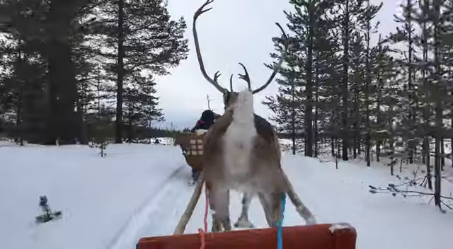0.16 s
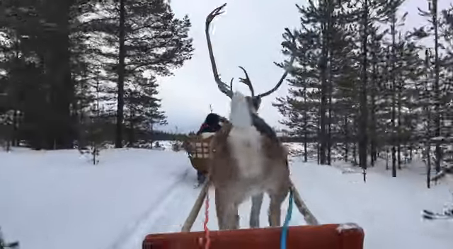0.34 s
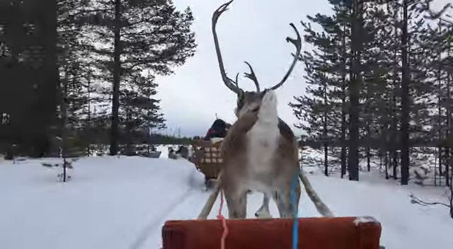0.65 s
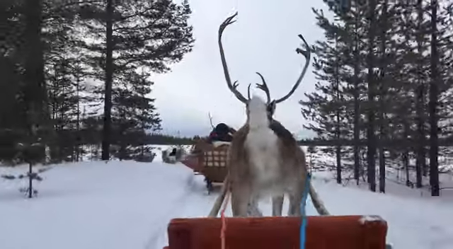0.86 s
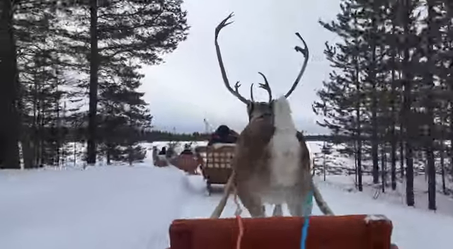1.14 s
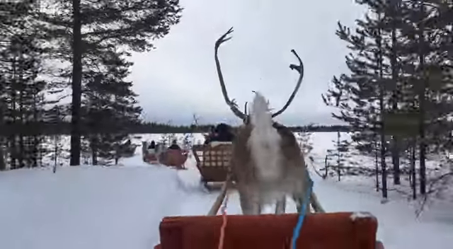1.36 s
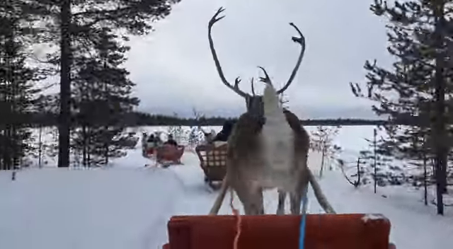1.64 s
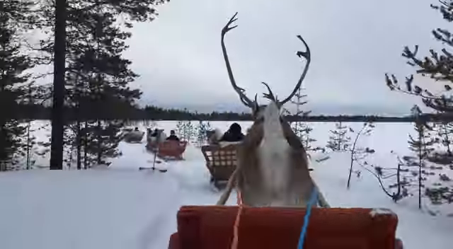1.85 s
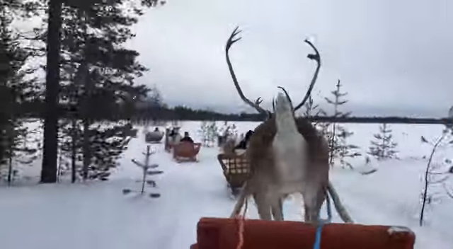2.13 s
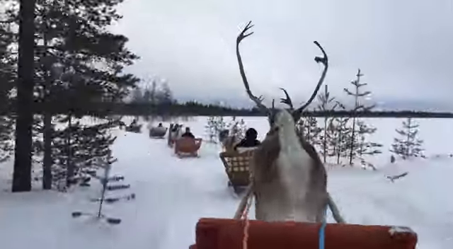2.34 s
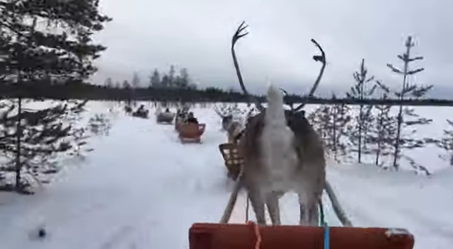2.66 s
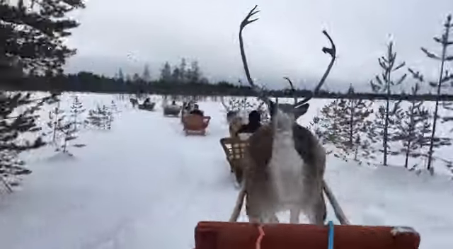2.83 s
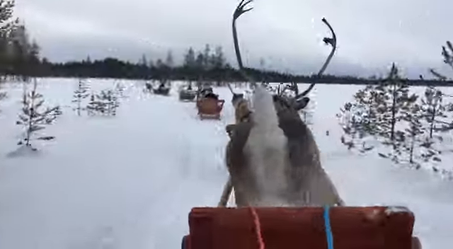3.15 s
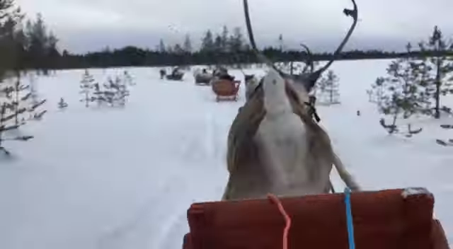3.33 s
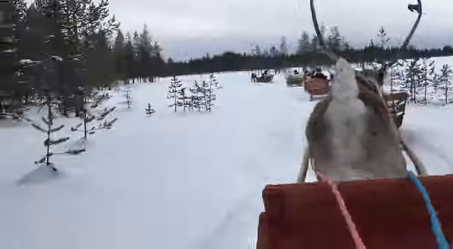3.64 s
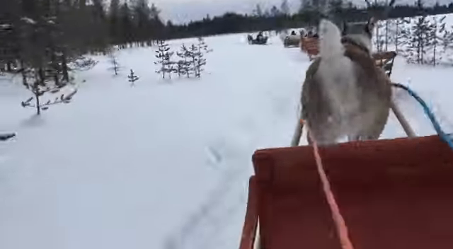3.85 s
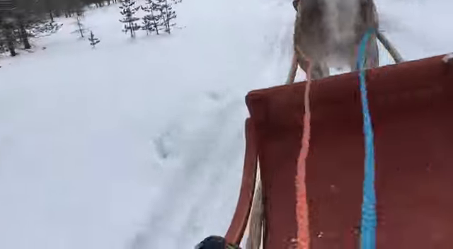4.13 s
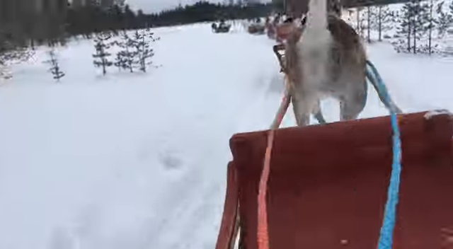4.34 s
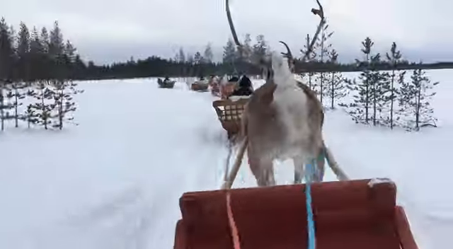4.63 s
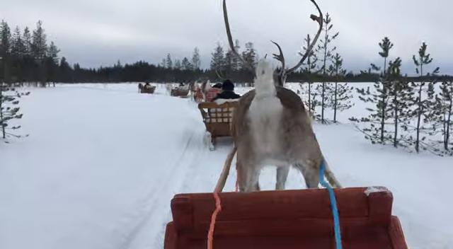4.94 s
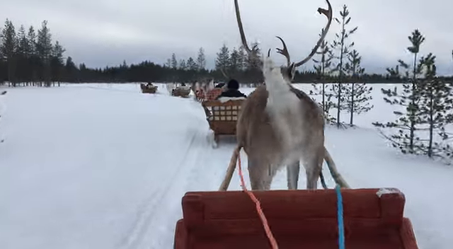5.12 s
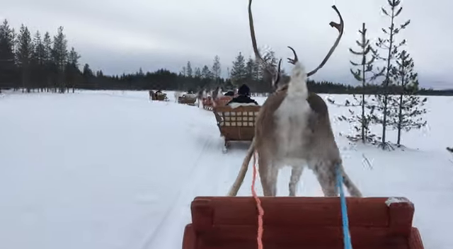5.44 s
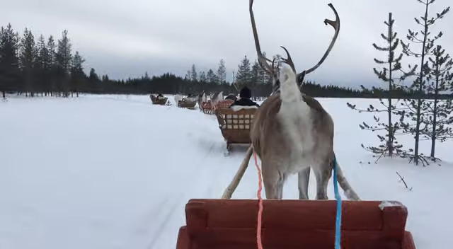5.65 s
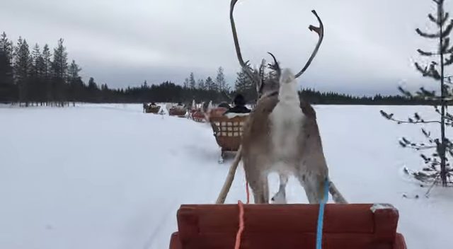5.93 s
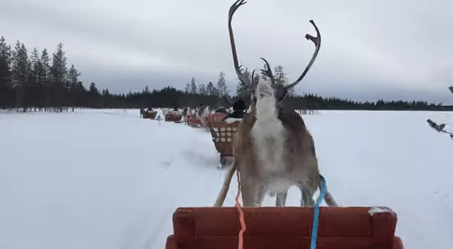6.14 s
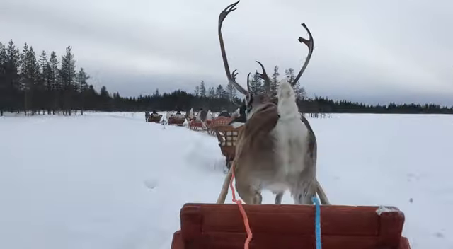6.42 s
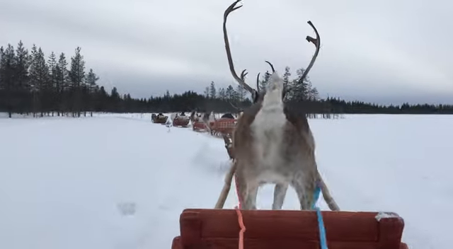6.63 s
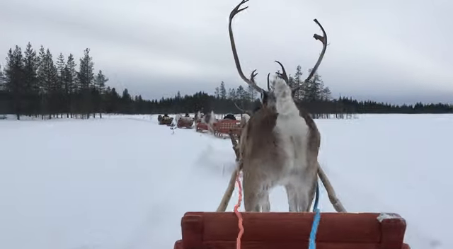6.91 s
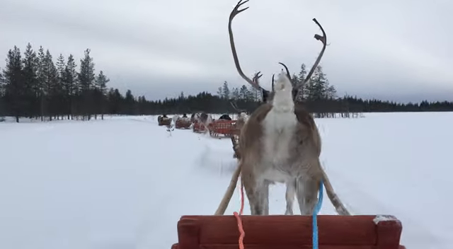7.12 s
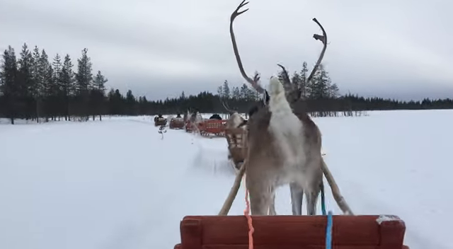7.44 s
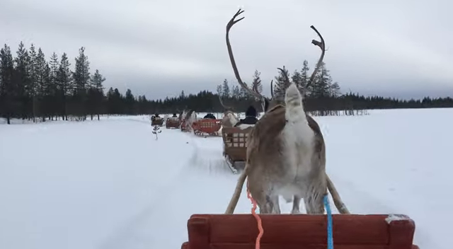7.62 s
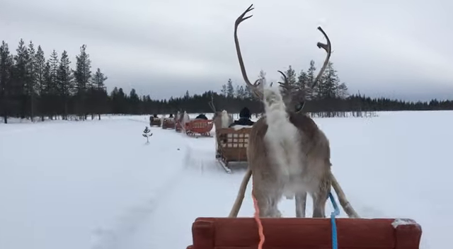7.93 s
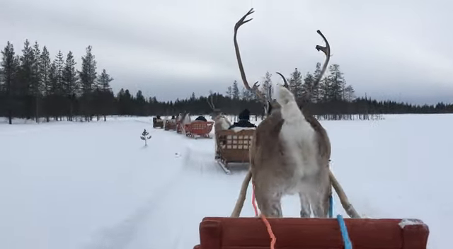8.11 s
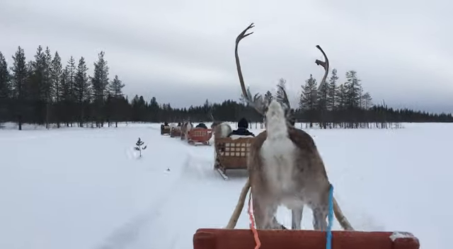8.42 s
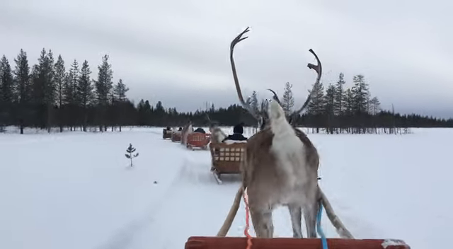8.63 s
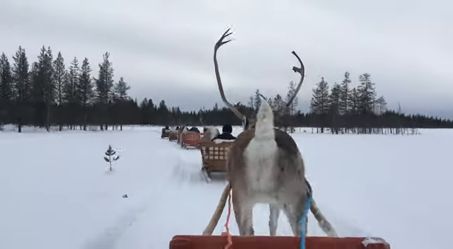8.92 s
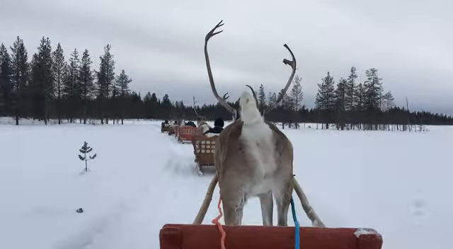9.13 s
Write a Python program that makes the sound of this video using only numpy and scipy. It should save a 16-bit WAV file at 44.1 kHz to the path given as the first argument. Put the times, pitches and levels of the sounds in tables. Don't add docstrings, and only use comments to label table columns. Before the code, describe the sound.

A microphone aboard a hollow wooden sleigh, close and dry in open air, as a reindeer pulls it over packed snow. A low uneven rumble and soft, grainy runner scrape continue throughout, with a thin hiss above. From 0 to 1.5 seconds, heavy dull thumps come quickly, strongest near 0.4 and 0.8, with board slaps, a short low groan and icy ticks. After a calmer gap, a hard wooden knock at 1.95 leads into bright crunches and a tiny squeak at 2.0. Another thump lands at 2.6. Around 3.1 to 3.3 a rough cluster booms, snaps and scrapes; lesser bumps follow at 3.7. Rapid thuds and knocks return from 4.35 to 4.65. A solid woody thump hits at 5.8, then lighter bumps, small rattles and muffled scraping continue to about 9.3, with very faint distant bell tinkles near 2.5, 7.5 and 8.3.

```python
import sys
import numpy as np
from scipy import signal
from scipy.fft import rfft, irfft, next_fast_len
from scipy.io import wavfile
from scipy.ndimage import uniform_filter1d, map_coordinates

SR = 44100
rng = np.random.default_rng(int(sys.argv[2]) if len(sys.argv) > 2 else 0)


def natural_amplitude(level_db):
    exponent = np.asarray(level_db, float) / 20
    return 10 ** exponent


def put_to_file(sound):
    columns = np.atleast_2d(sound).T
    safe = np.clip(columns, -1, 1)
    whole_steps = np.round(safe * 32767)
    wavfile.write(sys.argv[1], SR, whole_steps.astype(np.int16))


N = 408807

# mode_hz, width_hz, level_db
HULL = [
    (129.1, 48.5, -4),
    (173.4, 45, -.5),
    (232.5, 73, -8.5),
]
# mode_hz, width_hz, level_db
BOARDS = [
    (269, 65, -11),
    (366.5, 46, -8),
]
# mode_hz, width_hz, level_db
PLANK = [(384, 85, 1), (586, 70, 1.5), (662, 31, -4.5), (890, 57, -5), (1000, 89, -4.5), (1400, 200, -8.5),
         (1510, 120, -13), (1810, 400, -19.5)]
THUMP_RISE_S, THUMP_FALL_S = 0.013, 0.038


def unit(x):
    return x / np.sqrt(np.mean(x ** 2) + 1e-20)


def peaked(x):
    return x / np.abs(x).max()


def curves(rows):
    s, *cols = np.transpose(rows)
    return [np.interp(np.arange(N) / SR, s, c) for c in cols]


def wobble(rate):
    knots = rng.standard_normal(int(N * rate / SR) + 4)
    return map_coordinates(knots, [np.arange(N) * rate / SR])


def filtered(x, response):
    m = next_fast_len(len(x) + 2048)
    return irfft(rfft(x, m) * response(np.fft.rfftfreq(m, 1 / SR)), m)[:len(x)]


def coloured(x, spectrum):
    f, db = np.transpose(spectrum)
    return unit(filtered(x, lambda hz: natural_amplitude(np.interp(np.log(hz + 1), np.log(f), db, -120, -120))))


def resonances(modes):
    def response(f):
        total = 0
        for k, (c, w, db) in enumerate(modes):
            total = total + (-1) ** k * natural_amplitude(db) * 1j * f * w / (c * c - f * f + 1j * f * w)
        return total
    return response


def gritty(per_s, spread_db, share, patchy_db):
    z = signal.stft(rng.standard_normal(N), nperseg=512)[2]
    field = uniform_filter1d(rng.standard_normal(z.shape), size=6, axis=0)
    field = uniform_filter1d(field, size=6, axis=1)
    noise = signal.istft(z * natural_amplitude(patchy_db * unit(field)), nperseg=512)[1][:N]
    force = rng.standard_normal(N) * natural_amplitude(spread_db * rng.exponential(size=N))
    breaks = (rng.random(N) < per_s / SR) * force
    share = np.clip(share, 0, 1)
    return np.sqrt(1 - share) * unit(noise) + np.sqrt(share) * unit(breaks)


def add(track, s, sound):
    at = track[round(s * SR):][:len(sound)]
    at += sound[:len(at)]


def ring(hz, t60, attack):
    t = np.arange(SR // 8) / SR
    return np.sin(2 * np.pi * hz * t) * natural_amplitude(-60 * t / max(t60, .002)) * (1 - np.exp(-t / attack))


def burst(t60, attack):
    t = np.arange(SR // 8) / SR
    return rng.standard_normal(len(t)) * natural_amplitude(-60 * t / max(t60, .004)) * (1 - np.exp(-t / attack))


def swells(events, rise_s, fall_s):
    t, power = np.arange(N) / SR, np.zeros(N)
    for s, db in events:
        near = slice(max(round((s - .25) * SR), 0), round((s + .35) * SR))
        lag = t[near] - s
        power[near] += natural_amplitude(2 * db) * np.exp(-(lag / np.where(lag < 0, rise_s, fall_s)) ** 2)
    return power


def thumps():
    # start_s, peak_db, mode_hz, boards_db
    deep = [(.072, -9, 89, -13.5), (.38, -1, 141.6, -24), (.583, -11, 129, -9.5), (.807, -4.5, 150, -9),
            (.88, -6, 148, -18), (.958, -12, 100, -34), (1.269, -12.5, 227, -5), (1.957, -5, 134, -5),
            (2.573, -3.5, 143.4, -8), (2.746, -10, 141, -13), (2.944, -8.5, 163.5, -34),
            (3.109, -7.5, 183, -9), (3.228, 0.5, 156, -29), (3.672, -5, 136, -18), (3.726, -5.5, 161, -23),
            (4.35, -7.5, 144, -20), (4.413, -4, 131.6, -6), (4.474, -0.5, 143.4, -13),
            (4.528, -5, 134, -6.5), (4.638, -8.5, 134, -17), (5.136, -13.5, 182, -32),
            (5.796, -3, 127, -3.5), (6.02, -9, 139, -8), (6.584, -11.5, 150, -25), (7.437, -12, 144, -6.5),
            (8.011, -11.5, 164, -20), (8.278, -13, 140, -15), (8.44, -8, 168, -19),
            (8.583, -10.5, 167, -11), (8.923, -10, 149, -6.5)]
    # start_s, peak_db, mode_hz
    prints = [(0.017, -17, 171), (.35, -10, 166), (6.2, -22, 175), (6.235, -19.5, 175), (6.318, -13.5, 167),
              (6.47, -17.5, 170), (3.127, -10, 169), (.62, -11, 85), (.915, -10, 170), (1.308, -12, 90),
              (2.6, -9, 159), (2.955, -11, 150), (1.462, -19, 150), (1.586, -17.5, 123), (2.146, -16, 171),
              (2.496, -15.5, 128), (2.9, -14, 167), (3.247, -4, 161), (3.271, -2, 138), (4.44, -7.5, 141),
              (3.449, -14, 170), (8.672, -12.5, 193), (3.596, -9, 188), (3.836, -12.5, 155),
              (4.815, -15.5, 178), (5.305, -18, 155), (5.468, -17, 122), (6.299, -17, 337),
              (6.43, -20.5, 360), (6.679, -19.5, 221), (6.816, -22.5, 172), (6.934, -17.5, 94),
              (6.998, -18.5, 236), (7.307, -16, 169), (7.561, -17.5, 179), (7.68, -21, 157),
              (7.899, -13.5, 180), (8.129, -21, 177), (8.374, -21, 141), (9.083, -14.5, 149),
              (9.221, -12.5, 147)]
    return deep + [(s, db, hz, -16.5) for s, db, hz in prints]


def unevenness_db():
    # centre_s, level_db
    dips_and_swells = [(.53, -4), (1.03, -3), (1.86, -4), (2.35, -3.5), (2.68, -2), (2.99, -5.5), (3.2, -5.5),
                       (3.49, -5), (4.78, -4), (4.96, -4), (5.03, -4), (5.24, -3), (5.77, -3), (5.98, -4),
                       (6.39, -5.5), (6.65, -3), (6.88, -5.5), (8.23, -9), (8.32, -7), (8.52, -3.5), (8.77, -8),
                       (9.0, -2.5), (9.06, -3.5), (.13, 3.5), (.47, 3), (1.45, 2.5), (1.62, 1.5), (2.03, 5),
                       (2.8, 1.5), (3.06, 3.5), (3.71, 3.5), (4.24, 3), (4.32, 3.5), (4.46, 3), (4.52, 5),
                       (5.1, 4.5), (5.43, 4), (5.61, 4.5), (6.15, 3.5), (6.27, 3.5), (6.49, 3.5), (7.07, 3.5),
                       (7.5, 3), (7.61, 5), (7.77, 4.5), (8.05, 4), (8.45, 3), (8.69, 2.5)]
    half_s = 0.028
    out, hump = np.zeros(N + SR), signal.windows.hann(round(4 * half_s * SR))
    for s, db in dips_and_swells:
        add(out, s - 2 * half_s, db * hump)
    return out[:N]


def hull():
    # time_s, level_db
    bumpiness = [(0, -28), (.25, -23), (.5, -22.5), (.77, -22.5), (.95, -34), (1.06, -34), (1.27, -23.5),
                 (1.9, -32), (2.19, -28.5), (2.39, -37), (2.55, -29.5), (3.17, -23.5), (3.54, -33),
                 (4.3, -23), (5.21, -28), (6.3, -27), (7.15, -33), (9.27, -25)]
    # centre_s, level_db
    lurches = [(0.1, -22), (0.4, -22.4), (0.63, -20), (0.89, -17), (1.32, -17), (1.5, -23), (1.77, -22),
               (1.99, -27), (2.17, -28), (2.3, -22.5), (2.53, -22), (2.67, -26.5), (2.77, -23), (3.28, -23),
               (3.36, -25.5), (3.73, -28), (4.07, -30), (4.42, -28), (5.81, -30), (6.63, -24.5),
               (6.8, -22.5), (7.03, -24.5), (7.26, -27.7), (7.45, -32), (7.86, -24.5), (8.17, -31.5),
               (8.29, -30.5), (8.5, -32), (8.94, -32), (9.1, -29)]
    # frequency_hz, density_db (per Hz)
    sway_spectrum = [(22, -30), (32, -9), (45, -2), (65, 0), (90, -1), (120, -14), (160, -60)]
    ride_db, = curves(bumpiness)
    shudder = swells([(s + 0.01, db - 11.5) for s, db, *_ in thumps()], THUMP_RISE_S, THUMP_FALL_S)
    boom_gain = np.sqrt(natural_amplitude(2 * ride_db) + shudder) * natural_amplitude(unevenness_db())
    lurch = swells(np.add(lurches, [0, -2.5]), rise_s=0.044, fall_s=0.052)
    steady_db = -41 + 0.49 * (ride_db - ride_db.mean())
    sway_gain = np.sqrt(natural_amplitude(2 * steady_db) + lurch)

    jolts = natural_amplitude(1.5 * wobble(25) + .6 * wobble(9))
    shake = gritty(per_s=60, spread_db=1.2, share=0.3, patchy_db=0.56) * jolts
    boom = unit(filtered(shake, lambda f: resonances(HULL)(f) / (1 + (f / 300) ** 4)))
    boards = unit(filtered(shake, lambda f: resonances(BOARDS)(f) / (1 + (f / 450) ** 6)))
    slats = unit(filtered(shake, lambda f: resonances(PLANK[1:])(f) / (1 + (f / 1500) ** 4)))
    boards += natural_amplitude(-22.5) * slats
    sway = coloured(rng.standard_normal(N) * natural_amplitude(0.9 * wobble(13)), sway_spectrum)
    boards_gain = natural_amplitude(-14.5 + 3.34 * wobble(4.5))
    return boom_gain * (natural_amplitude(-3.5) * boom + boards_gain * boards) + sway_gain * sway


def runners():
    # time_s, level_db
    hardness = [(0, -46), (.31, -41), (.59, -46.5), (1.0, -48.5), (1.35, -47), (2.27, -47.5), (2.66, -43.5),
                (2.98, -43), (3.1, -33.5), (3.36, -44.5), (3.59, -38), (3.8, -45), (4.65, -47.5),
                (5.52, -45.5), (5.99, -49.5), (6.38, -45), (6.7, -48.5), (9.27, -47.5)]
    hooves = [1.22, 1.84, 2.15, 2.37, 2.45, 3.451, 3.71, 3.94, 4.19, 4.64, 4.95, 5.42, 5.56, 5.65, 5.94,
              6.09, 6.21, 6.98, 7.1, 7.22, 7.42, 7.56, 7.69, 8.25, 8.43, 8.56, 8.86]
    # frequency_hz, density_db (per Hz)
    scrape_spectrum = [(240, -32), (400, -0.5), (507, -10.5), (641, -7), (1200, -16), (1350, -16.5),
                       (1970, -19.5), (2520, -23.5), (4200, -37.5), (5460, -65), (9240, -120)]
    # frequency_hz, density_db (per Hz)
    hiss_spectrum = [(2240, 0.5), (3800, -2.5), (4830, -8), (6190, -3), (7870, -7), (9310, -3), (10500, -7),
                     (12700, 0), (15100, -6.5), (16000, -1)]
    scrape_db, = curves(hardness)
    hiss_db = -54 + (scrape_db - scrape_db.mean())
    spray = swells([(s, -50.5) for s in hooves], rise_s=0.011, fall_s=0.011)
    grind = swells([(s, db - 40) for s, db, *_ in thumps()], THUMP_RISE_S, THUMP_FALL_S)
    rough = .3 * wobble(13) + .8 * wobble(35)
    scrape = coloured(gritty(per_s=700, spread_db=2.5, share=0.24, patchy_db=2.0), scrape_spectrum)
    hiss = coloured(gritty(per_s=2500, spread_db=1.3, share=0.35, patchy_db=2.6), hiss_spectrum)
    scrape_gain = np.sqrt(natural_amplitude(2 * scrape_db) + grind) * natural_amplitude(0.3 + 1.6 * rough + 0.65 * unevenness_db())
    open_air = natural_amplitude(2 * -56)
    hiss_gain = np.sqrt(natural_amplitude(2 * hiss_db + 6 * rough) + spray + open_air)
    return scrape_gain * scrape + hiss_gain * hiss


def ruts():
    out, t60, rows = np.zeros(N), 0.098, thumps()
    chances = rng.standard_normal((len(rows), len(HULL)))
    for (s, db, hz, boards_db), chance in zip(rows, chances):
        main = ring(hz, t60, 0.0067)
        others = sum(natural_amplitude(level + 2 * c) * ring(f, 0.77 * t60, 0.0044) for (f, _, level), c in zip(HULL, chance))
        jar = burst(0.46 * t60, 0.0036)
        boards = peaked(filtered(jar, lambda f: resonances(BOARDS)(f) / (1 + (f / 450) ** 6)))
        add(out, s, natural_amplitude(db) * (natural_amplitude(1.04) * main + natural_amplitude(-10.0) * others + natural_amplitude(boards_db - 1.5) * boards))
    return out


def taps():
    # start_s, peak_db, mode_hz
    slaps = [(0.039, -26, 203), (0.075, -18.5, 218), (0.284, -23, 202), (0.495, -20, 234),
             (0.587, -13, 202), (0.807, -14, 299), (0.911, -12, 269), (1.223, -24, 347), (1.359, -15, 350),
             (1.467, -22, 215), (1.955, -9, 326), (2.155, -20, 261), (2.487, -21, 240), (2.535, -18, 210),
             (2.573, -10, 340), (2.741, -17, 202), (2.871, -26, 234), (2.944, -18, 229), (3.227, -9, 353),
             (3.665, -18, 285), (4.411, -10, 256), (4.475, -10, 231), (4.626, -16, 258), (5.799, -7, 353),
             (6.02, -15, 300), (6.686, -23, 229), (6.784, -19, 337), (6.934, -26, 307), (7.439, -17, 231),
             (7.769, -19, 240), (7.874, -23, 240), (8.279, -22, 229), (8.586, -17, 223), (8.677, -19, 242),
             (8.829, -26, 240), (8.922, -16, 240), (9.142, -24, 202), (9.22, -23, 258)]
    out, t60, rise_s = np.zeros(N), 0.062, 0.0033
    for s, db, hz in slaps:
        upper = ring(1.9 * hz, .5 * t60, rise_s)
        add(out, s - .002, natural_amplitude(db - 3) * (ring(hz, t60, rise_s) + natural_amplitude(-11) * upper))
    return out


def shafts():
    # start_s, peak_db, loudest_mode_hz, snap_db
    knocks = [(.078, -19, 450, -40), (0.176, -28.5, 683, -5.5), (0.337, -24.5, 1130, -3),
              (.371, -21.5, 1250, -25), (.381, -23, 890, -6.5), (0.562, -32, 686, -20),
              (.586, -16.5, 705, -14), (.801, -11.5, 592, -19), (0.876, -21, 437, -20),
              (0.91, -23.5, 600, -15), (1.288, -23, 600, -25), (1.357, -16.5, 714, -31),
              (1.461, -29, 600, -40), (1.952, -7, 560, -14), (2.156, -29.5, 460, -14),
              (2.571, -19.5, 695, -16), (3.124, -22.5, 1130, -13), (3.229, -18.5, 1100, -6),
              (3.237, -17, 1300, 0.5), (3.254, -19, 1200, -4), (3.283, -24, 1000, -11),
              (3.263, -15.5, 510, -21), (3.43, -21.5, 890, -20), (3.597, -21.5, 454, -10),
              (3.663, -27, 945, -5.5), (4.391, -17.5, 664, -37), (4.472, -16.5, 686, -32),
              (4.521, -21.5, 700, -33), (4.81, -32, 550, -9), (4.898, -30, 780, -8.5),
              (5.794, -11.5, 550, -36), (6.016, -17.5, 664, -22), (8.01, -27, 452, -12),
              (8.915, -29.5, 662, -17)]
    # start_s, peak_db
    rattles = [(1.221, -33.5), (1.598, -30), (2.489, -32.5), (2.633, -28), (6.819, -29.5), (7.226, -34),
               (7.341, -35.5), (7.437, -35), (9.14, -37.5)]
    out, t60 = np.zeros(N), 0.09
    for s, db, hz, snap_db in knocks + [(s, db, 600, -8.5) for s, db in rattles]:
        body = filtered(burst(t60, .003), lambda f: 1 / (1 + 1j * f / (1.47 * hz)) ** 2)
        contact = burst(0.054, 0.0011) + natural_amplitude(-1) * body
        contact[30] += 8
        modes = resonances(PLANK + [(hz, 110, 3)])
        wood = filtered(contact, lambda f: modes(f) / (1 + 1j * f / (3.5 * hz)) ** 2)
        snap = filtered(burst(1.12 * t60, 0.00038), lambda f: resonances([(2500, 1500, 0)])(f) ** 2)
        add(out, s - .001, natural_amplitude(db) * (natural_amplitude(1.0) * peaked(wood) + natural_amplitude(snap_db - 3.0) * peaked(snap)))
    return out


def crust():
    # start_s, peak_db, strongest_hz
    ticks = [(.1176, -34, 9220), (.337, -29, 6000), (.381, -34, 4020), (.599, -19.5, 6400),
             (.725, -27, 13500), (0.8007, -24, 8250), (.8719, -33, 6370), (1.108, -28.5, 6300),
             (7.34, -37, 2500), (7.226, -41, 2800), (6.582, -41, 2300), (1.342, -21, 13700),
             (1.9083, -27.5, 12800), (1.956, -21, 12500), (1.982, -14, 8700), (2.006, -14, 13200),
             (2.5915, -25, 5400), (2.603, -25, 8540), (2.86, -25, 7000), (2.919, -21.5, 8050),
             (2.919, -24, 3000), (3.237, -19, 4200), (3.5239, -30, 12500), (3.554, -19.5, 6130),
             (4.038, -30, 11800), (4.389, -29, 5600), (4.441, -33, 4300), (4.482, -30, 11000),
             (4.543, -37, 11000), (5.138, -29.5, 12400), (6.5806, -28.5, 6240), (6.819, -33, 5950),
             (6.976, -35, 6000), (7.948, -26.5, 5970), (8.919, -32.5, 9000), (9.1157, -29, 11800)]
    out = np.zeros(N)
    for s, db, hz in ticks:
        ice = resonances([(hz, 1800, 0), (5000, 5000, -6), (13000, 5000, -6)])
        add(out, s - .001, natural_amplitude(db - 3.0) * peaked(filtered(burst(0.028, 0.00067), ice)))
    return out


def crunches():
    # start_s, length_s, centre_hz, width_hz,
    # level_db
    scuffs = [(1.978, 0.062, 5300, 10000, -30.5), (3.228, 0.048, 1500, 2200, -28),
              (3.7, .045, 7000, 9000, -40), (3.228, 0.051, 5700, 700, -37), (3.233, .015, 2200, 900, -24),
              (3.229, 0.023, 4100, 920, -30), (3.05, .045, 2000, 1200, -42), (4.392, .028, 2000, 1150, -32),
              (4.378, .016, 2700, 400, -41), (4.378, 0.027, 9900, 500, -44), (4.385, .03, 7000, 8000, -43),
              (4.398, .014, 4600, 400, -46), (4.475, 0.057, 1950, 2000, -44),
              (1.952, .016, 1360, 1300, -22), (1.975, 0.049, 1000, 1600, -31.5),
              (2.598, .018, 4500, 9200, -37.5), (2.568, 0.019, 1000, 1000, -31.5),
              (.335, 0.018, 1700, 900, -32), (.376, 0.021, 2400, 1200, -37), (.722, .02, 2400, 1200, -43),
              (.73, .025, 1000, 300, -41), (3.11, 0.047, 2000, 1500, -38), (4.474, .03, 870, 820, -35),
              (4.518, .02, 1000, 810, -35), (.8, .018, 1260, 900, -23.5), (5.797, 0.021, 970, 800, -24.5),
              (1.14, .28, 361, 55, -34), (2.6, .035, 8200, 9000, -47), (3.43, .035, 1230, 1300, -37),
              (4.39, .04, 840, 900, -32), (4.8, 0.11, 840, 900, -43), (4.467, .007, 1240, 610, -26),
              (6.776, .022, 430, 220, -29), (2.743, 0.021, 470, 230, -29), (.335, 0.034, 3200, 400, -39)]
    # start_s, length_s, pitch_hz, level_db
    squeaks = [
        (2.013, .02, 3150, -28),
        (2.006, .026, 12700, -33),
        (2.012, .018, 5500, -31),
        (2.004, .012, 7600, -34),
        (9.11, .02, 11800, -46),
        (.17, .2, 174, -17),
        (5.783, .035, 2850, -41),
    ]
    out = np.zeros(N)
    for s, length, hz, width_hz, db in scuffs:
        n = round(length * SR)
        lumps = natural_amplitude(3.5 * np.repeat(rng.standard_normal(n // 90 + 1), 90)[:n])
        mode = resonances([(hz, 1.3 * width_hz, 0)])
        crush = filtered(lumps * rng.standard_normal(n), lambda f: mode(f) ** 3)
        add(out, s, natural_amplitude(db - 3.5) * signal.windows.tukey(n, .45) * unit(crush))
    for s, length, hz, db in squeaks:
        n = round(length * SR)
        drift = np.cumsum(rng.normal(0, 0.19 * min(hz / 5000, 1), n))
        tone = np.sin(2 * np.pi * hz * np.arange(n) / SR + drift)
        add(out, s, natural_amplitude(db) * signal.windows.tukey(n, .5) * tone)
    return out


def bell():
    # start_s, level_db
    tinkles = [(2.44, -53), (2.475, -55), (2.535, -53), (7.455, -53), (7.66, -57), (7.72, -54), (8.34, -54),
               (8.94, -58)]
    out, modes = np.zeros(N), resonances([(3660, 90, 0), (7400, 150, -8)])
    for s, db in tinkles:
        tinkle = filtered(burst(.18, .006), lambda f: modes(f) ** 2)
        add(out, s, natural_amplitude(db + 4.5) * peaked(tinkle))
    return out


def scene():
    ride = hull() + runners() + ruts() + taps() + shafts()
    return (ride + crust() + crunches() + bell())[None]


def band_limit(x):
    return signal.sosfilt(signal.butter(12, 17000, fs=SR, output="sos"), x)


def record(dry):
    # start_s, length_s
    dropouts = [(.577, .006), (.786, .011), (1.32, .005), (1.331, .006), (1.971, .006), (2.59, .01),
                (2.847, .008), (2.868, .012), (2.885, .011), (2.9, .017), (3.506, .009), (4.467, .007)]
    held = dry[0] / (1 + np.abs(dry[0] / .68) ** 6) ** (1 / 6)
    hole = np.zeros(N)
    for s, length in dropouts:
        add(hole, s, signal.windows.tukey(round(length * SR), .02 / (length + .02)))
    flicker = np.clip(.93 + .1 * wobble(200), 0, .98)
    treble = filtered(held, lambda f: 1 / (1 + (1900 / (f + 1)) ** 6))
    kept = filtered(held - hole * flicker * treble, lambda f: (f < 15900) / (1 + (30 / (f + 1)) ** 4))
    return band_limit(kept[None])


dry = scene()
out = record(dry)
put_to_file(out)
```